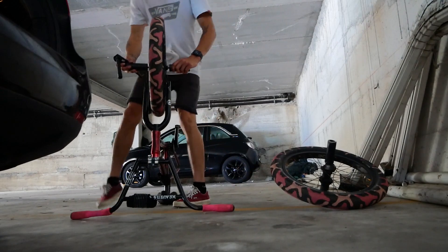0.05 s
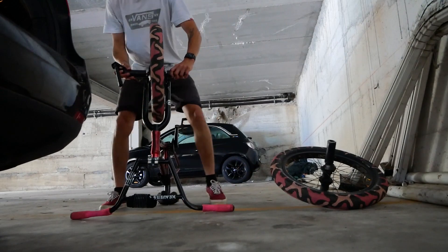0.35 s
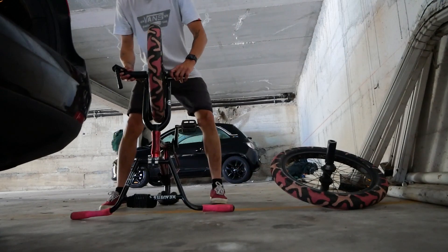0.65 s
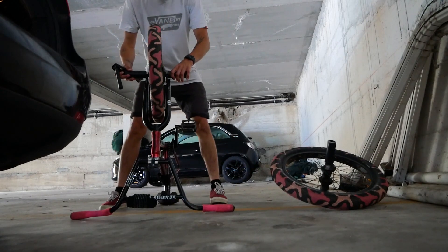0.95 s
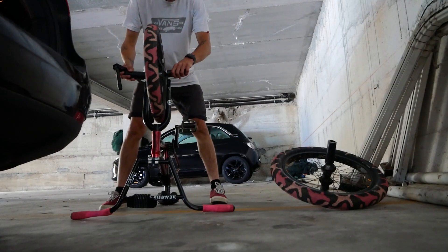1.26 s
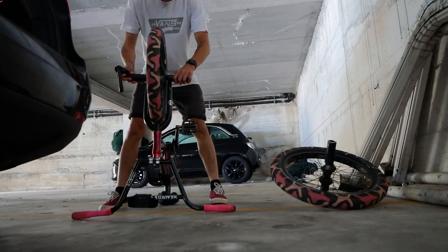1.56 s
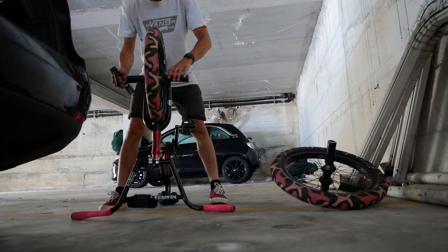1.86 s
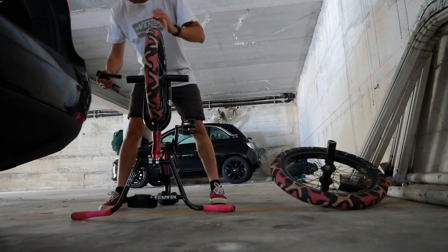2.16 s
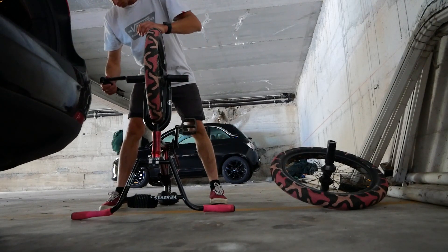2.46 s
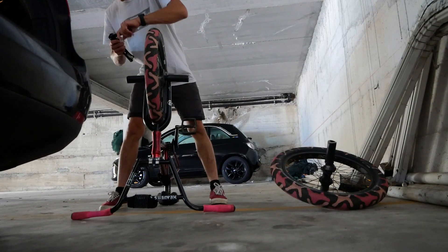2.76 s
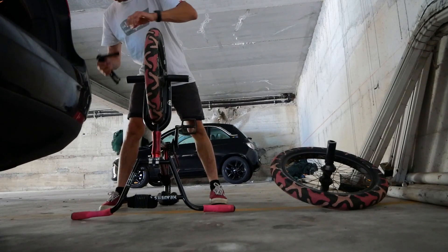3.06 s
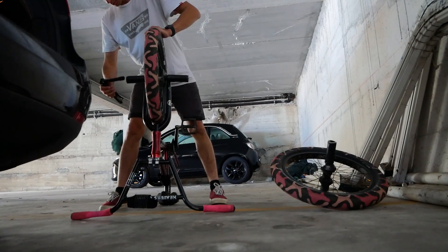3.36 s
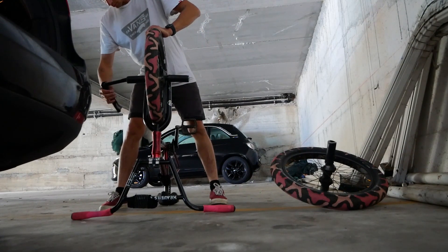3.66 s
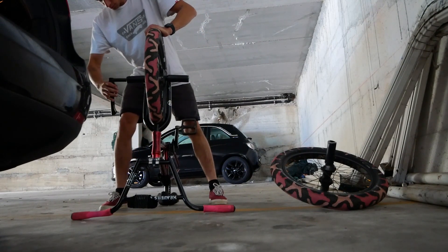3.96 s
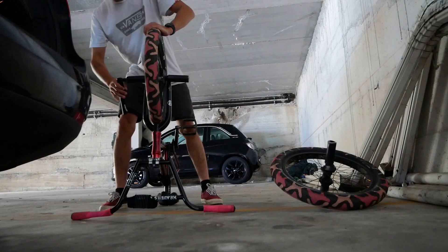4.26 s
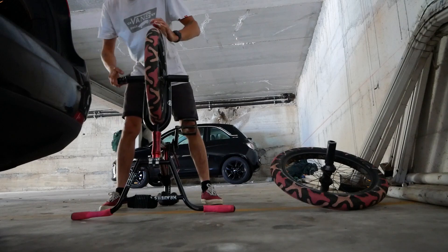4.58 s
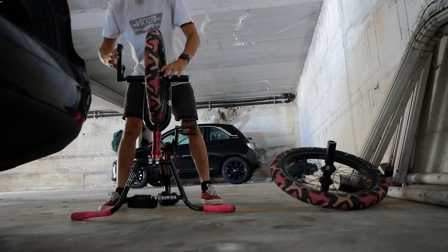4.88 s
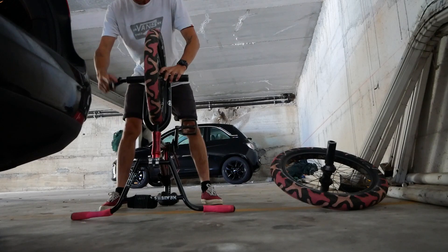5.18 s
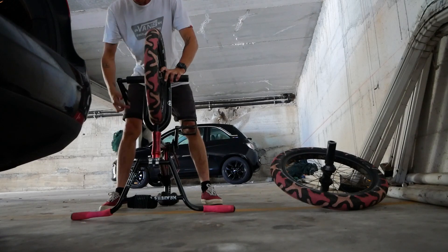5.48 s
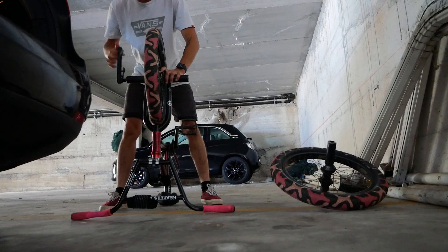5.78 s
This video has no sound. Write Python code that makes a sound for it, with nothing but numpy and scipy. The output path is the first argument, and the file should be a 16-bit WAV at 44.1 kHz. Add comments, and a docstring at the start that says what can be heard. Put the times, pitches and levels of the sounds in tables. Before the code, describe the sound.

In a bare concrete garage with a low hum and distant outdoor noise, someone fits bicycle parts near the microphone. Short gritty scrapes and hard metal knocks come first, with dull thumps and tiny ticks. Clothing brushes during a pause. A second run of bright clanks follows, with a faint high squeak and a far engine swelling, then gentler knocks and scrapes, all with a long echo.

```python
"""A bare concrete garage, the microphone close to an upturned bicycle, a low hum and far outdoor noise behind.
A metal part scrapes, then knocks: hard contacts and hand-damped clanks that leave the frame ringing
faintly and the walls answering with a long tail. Weight thumps on the floor, clothing brushes, tiny ticks snap.
After a lull from 2 s, the knocks return at 3.3 s as parts are fitted; near 4 s a far engine swells
and a part squeaks as it is pushed home. Softer knocks and scrapes end the scene."""
import sys
import numpy as np
from scipy import signal
from scipy.fft import rfft, irfft
from scipy.io import wavfile
from scipy.ndimage import uniform_filter1d

SR = 44100
rng = np.random.default_rng(int(sys.argv[2]) if len(sys.argv) > 2 else 0)


def store_wav(level_fs):
    """Save 16-bit WAV to argv[1]."""
    pcm = np.round(np.clip(np.atleast_2d(level_fs), -1, 1) * 32767)
    wavfile.write(sys.argv[1], SR, pcm.T.astype(np.int16))


N = 257103
TIME = np.arange(N) / SR


def undb(db):
    """Decibels to gain."""
    return 10 ** (np.asarray(db) / 20)


def unit(x):
    """Scale to rms 1."""
    return x / np.sqrt(np.mean(x ** 2))


def along(hz, points, values):
    """Join values by straight lines on a log-frequency axis."""
    return np.interp(np.log(hz + 1), np.log(points), values)


def tint(x, spectrum):
    """Colour a sound with (frequency [Hz], gain [dB]) points, at rms 1."""
    gain_db = along(np.fft.rfftfreq(len(x), 1 / SR), *np.transpose(spectrum))
    return unit(irfft(rfft(x) * undb(gain_db), len(x)))


def causal(gain):
    """Minimum-phase response of a gain curve: nothing sounds before the blow."""
    cepstrum = irfft(np.log(gain))
    cepstrum[len(cepstrum) // 2:] = 0
    cepstrum[1:] *= 2
    return np.exp(rfft(cepstrum))


def fade(t, t60):
    """Exponential decay, 60 dB in t60 seconds."""
    return np.exp(-np.log(1000) * t / t60)


def swell(start, length, attack, release):
    """Envelope that rises up to its start, holds and dies away; attack and release are time constants."""
    return np.exp(np.minimum(TIME - start, 0) / attack - np.maximum(TIME - start - length, 0) / release)


def add(track, s, sound):
    """Mix a sound in at time s."""
    i = int(s * SR)
    track[i:i + len(sound)] += sound[:N - i]


def through(x, response):
    """Pass a sound through an impulse response."""
    return signal.fftconvolve(x, response)[:N]


# distant outdoor noise as it reaches the garage: (frequency [Hz], relative level [dB])
OUTDOOR_SPECTRUM = [(20, -29), (38, -7), (60, -3), (110, -3.5), (200, -4), (250, -6.5), (300, 2), (400, -9),
                    (560, -6.5), (830, -4.5), (1500, -7.5), (4200, -24.5), (10000, -31.5), (15500, -31.5)]


def background(outdoor_db=-56, hum_hz=55, hum_db=-65):
    """Steady noise from far outside, over a low hum."""
    outdoors = undb(outdoor_db) * tint(rng.standard_normal(N), OUTDOOR_SPECTRUM)
    hum = undb(hum_db) * np.sqrt(2) * np.sin(2 * np.pi * hum_hz * TIME)
    return outdoors + hum


# one part sliding on another: (time [s], length [s], level [dB], hiss relative to the level [dB])
SLIDING_STROKES = [(0, 0.038, -27.5, -12.5), (0.069, 0.069, -32.5, -15.5), (0.186, 0.022, -32, 0.5),
                   (.245, .05, -39, -12), (0.338, 0.003, -43.5, 11.5), (1.253, .003, -44.5, -7),
                   (1.353, .005, -48, -19), (1.746, 0.013, -27, -32.5), (3.366, .004, -50, -18),
                   (3.78, 0.26, -49.5, -12.5), (4.059, 0.093, -45.5, -3.5), (4.182, 0.02, -30, -15),
                   (4.354, 0.02, -37.5, -28), (4.93, .05, -56, -15), (5.167, 0.11, -42.5, -21),
                   (5.418, .4, -58, -12)]


def scrape(slips_per_s=1100, scatter_db=2.7, attack_s=0.014, release_s=0.018):
    """Dense uneven slips shake the part during each stroke; faster sliding adds a gritty hiss."""
    slips = (rng.random((2, N)) < slips_per_s / SR) * rng.standard_normal((2, N))
    slips *= undb(scatter_db * rng.standard_normal((2, N)))
    grit = unit(slips) + 1.35 * rng.standard_normal((2, N))
    body = tint(grit[0], [(100, -41), (300, -17), (600, -10.5), (1000, -9), (1500, 4), (2250, 3.5),
                          (2900, -6), (4200, -11.5), (7000, -43), (15000, -46)])
    hiss = tint(grit[1], [(300, -35), (1500, -17), (2600, 6), (4000, 5.5), (6000, -1), (8000, -7),
                          (11000, -13.5), (15000, -26)])
    return sum(undb(db) * swell(s, length, attack_s, release_s) * (body + undb(hiss_db) * hiss)
               for s, length, db, hiss_db in SLIDING_STROKES)


# long rings of the frame and its fittings, with a resonance of the garage itself near 311 and 325 Hz:
# (frequency [Hz], relative level [dB], t60 [s])
FRAME_MODES = [(232, -9.5, 2.8), (311.3, -4, 0.49), (325.5, 1.5, 0.16), (847.5, 3, 0.19), (1119, 2.5, 0.43),
               (1174, -0.5, 1), (1354, 1.5, 0.37), (1606, -17, 1.6), (2140, -35, .8), (2250, -13.5, 0.51),
               (2530, -24, 0.52), (2680, -14, 0.42), (2730, -19, 0.2), (3002, -26, 0.37), (3620, -14, 0.71),
               (3940, -12.5, 1.03), (4370, -24, 0.17), (4570, -34, .65), (5600, -30, 0.21),
               (5610, -9, 0.31), (6588, -14, 1.9)]


def frame_ring(contacts, ring_db=-58):
    """Lightly damped modes of tubes and fittings ring on after each scrape and blow, and the garage answers
    briefly near 320 Hz."""
    t = TIME[:SR]
    modes = sum(undb(db) * fade(t, t60) * np.cos(2 * np.pi * hz * t) for hz, db, t60 in FRAME_MODES)
    return undb(ring_db) * through(contacts, modes)


# tail of the bare concrete room: (frequency [Hz], t60 [s], relative level [dB])
GARAGE_TAIL = [(95.4, 1.1, -5.5), (239, 1.38, 3.5), (316, 0.93, 7), (394, 1.42, 5), (735, 1.54, 2),
               (1550, 1.594, -1.5), (2730, 1.46, -5), (5400, 1.41, -8), (9000, 0.89, -6),
               (15300, 0.41, -19)]


def garage(early_db=-7, early_t60=0.39, tail_db=-4, build_s=0.0016, bands=27):
    """Near walls and floor answer first, then a diffuse tail that loses its treble."""
    t = TIME[:2 * SR]
    f = np.fft.rfftfreq(len(t), 1 / SR)
    hz, t60, db = np.transpose(GARAGE_TAIL)
    spectrum = rfft(rng.standard_normal(len(t)))
    centres = np.geomspace(hz[0], hz[-1], bands)
    tail = 0
    for centre, weights in zip(centres, np.eye(bands)):
        band = irfft(spectrum * along(f, centres, weights))
        tail += band * fade(t, along(centre, hz, t60)) * undb(along(centre, hz, db))
    onset = 1 - np.exp(-(t / build_s) ** 2)
    reflections = rng.standard_normal(len(t)) * (rng.random(len(t)) < .05)
    early = unit(reflections * fade(t, early_t60) * onset) / np.sqrt(len(t))
    return undb(early_db) * early + undb(tail_db) * tail * onset / np.sqrt(.1 * SR)


def shifting_echo(x, shift_hz=1.7):
    """The parts move between blows, so the pattern of echoes at the microphone keeps shifting."""
    angle = 2 * np.pi * shift_hz * TIME
    return through(x * np.cos(angle), garage()) + through(x * np.sin(angle), garage())


# short rings of the hand-held steel part: (frequency [Hz], width [Hz], nominal lift [dB])
STEEL_MODES = [(3705, 210, 4.5), (4140, 260, 1.5), (4700, 40, 8.5), (6670, 96, 8.5), (7140, 130, 10),
               (7790, 220, 7.5), (8550, 63, 9.5), (9590, 790, 7), (10720, 56, 11.5), (11260, 100, 12),
               (13050, 450, 24.5), (13700, 120, 11), (14000, 140, 18), (14800, 180, 26)]


def steel_gain(f, grip_db=7.5):
    """The grip and the point of contact favour different resonances of the part at each blow."""
    favour = undb(grip_db * rng.standard_normal(len(STEEL_MODES)))
    peaks = sum(share * (undb(db) - 1) / (1 + (2 * (f - hz) / width) ** 2)
                for share, (hz, width, db) in zip(favour, STEEL_MODES))
    return (1 + peaks) * undb(along(f, [2500, 6000, 10000], [0, -2.5, -6]))


# mean colour of a clank: (frequency [Hz], relative level [dB])
CLANK_SPECTRUM = [(100, -22.5), (200, -16), (310, -6), (480, -8.5), (800, -1.5), (1100, -5.5), (1500, 2),
                  (2100, 1), (2900, -4), (4200, -10.5), (5700, -11.5), (7000, -27), (11000, -29),
                  (15500, -65)]


def clank(weight_db, hardness_db, ping_hz, contact_share, t60, crack_t60=0.037, size=8192):
    """A hard contact, then a crowd of short modes with one leading ping."""
    t, f = TIME[:size], np.fft.rfftfreq(size, 1 / SR)
    body, crack = rng.standard_normal((2, size))
    body = tint(body, [(100, -4.5), (2200, 6), (5000, -13), (15000, -3)]) * fade(t, t60)
    crack = tint(crack, [(300, 5.5), (1500, -20), (3500, 6), (15000, -14)]) * fade(t, crack_t60)
    modes = rfft(unit(body + 0.56 * crack)) / np.sqrt(size)
    push = 1 / (1 + 1j * f / 6000)  # the contact lasts a moment, which rounds its treble
    spectrum = np.sqrt(1 - contact_share) * modes + np.sqrt(contact_share) * push
    outline = np.sqrt(uniform_filter1d(abs(spectrum) ** 2, 75))  # divided out to leave the fine peaks
    # weight lifts the thud and, less, the knock; hardness lifts the brightness and the fizz above it
    knock_db, fizz_db = 0.65 * weight_db, 1.44 * hardness_db - 1.5
    colour_db = along(f, *np.transpose(CLANK_SPECTRUM))
    colour_db += along(f, [350, 850, 1500, 2300, 4000, 9000],
                       [weight_db, knock_db, 0, 0, hardness_db, fizz_db])
    # small stiff parts ping more purely than large ones; a firm contact damps the ping and so widens it
    ping_db = 6.5 + 3.2 * np.log2(ping_hz / 2000)
    width_hz = 100 * (1 + 3 * contact_share)
    ping = 1 + (undb(ping_db) - 1) / (1 + ((f - ping_hz) / width_hz) ** 2)
    sound = irfft(spectrum * causal(undb(colour_db) * ping * steel_gain(f) / outline))
    return sound / np.sqrt(np.sum(sound ** 2) / (0.012 * SR))  # the energy of 12 ms at rms 1


def blow(db, weight_db, hardness_db, ping_hz, contact_share, firm_db=-17, firm_t60=0.053):
    """One contact: a firm blow comes from a tight grip, which damps the clank sooner."""
    t60 = firm_t60 * 2 ** ((firm_db - db) / 47)  # twice as long when 47 dB softer
    return undb(db) * clank(weight_db, hardness_db, ping_hz, contact_share, t60)


# metal on metal at the bicycle: (time [s], level [dB], weight [dB], hardness [dB], ping [Hz],
# bare contact share [0-1], rebound [share of the blow])
METAL_BLOWS = [(0.131, -28.5, 9, -2, 1930, 0, 0), (0.2463, -19, 1, -26, 2030, 0.03, 0.12),
               (0.334, -19.5, 2.5, -1.5, 1960, .05, 0.58), (0.6481, -23, -3.5, -1, 2070, 0.21, 0.2),
               (1.2422, -33, 3, -1, 1850, 0, 0), (1.257, -28.5, 4.5, 0, 2010, .25, 0.059),
               (1.4061, -23, -2, 2.5, 2950, 0.42, 0.39), (1.438, -20.5, 1.5, 7.5, 1670, 0.08, 0.58),
               (1.527, -19, -3, -3, 2160, 0.44, 0.18), (1.615, -16.5, -5.5, 1.5, 1880, 0, .3),
               (1.6285, -15, 1, 5, 1980, 0, 0), (1.7574, -27.5, 7, 8.5, 1940, 0.4, 0.11),
               (2.838, -48.5, 2, 6.5, 4950, 0.27, 0), (3.343, -44, 6.5, 0.5, 1960, .1, 0.56),
               (3.376, -36, 3.5, -1.5, 2020, 0, 0.53), (3.388, -45, 11, 14, 12800, 0.5, 0.098),
               (3.4716, -35, 4, -1, 2000, 0.06, 0.015), (3.573, -22, -1, 5.5, 1770, 0.28, .1),
               (3.9278, -33, -2, 8, 4000, .1, 0.11), (3.9375, -29.5, 2, 11.5, 3870, 0.6, 0.028),
               (4.109, -33, 8, 4.5, 2630, 0.37, 0), (4.1376, -22.5, 3, 12.5, 3920, 0.37, 0.34),
               (4.151, -20.5, -3.5, 12, 1700, 0.03, 0.93), (4.213, -20, -8, 6, 5700, .4, 0.76),
               (4.3009, -17.5, -2, 4.5, 5760, .15, 0.3), (4.347, -26.5, -7, 2.5, 2100, .1, 0),
               (4.78, -32, -4.5, 0.5, 3420, 0.69, 0.014), (5.004, -41, 5.5, -13, 1410, 0.34, 0),
               (5.064, -45, 6, -10, 1250, 0.06, 0.083), (5.1648, -34.5, 9, 0.5, 1720, 0.13, 0.14),
               (5.1987, -24, -4, 4.5, 2530, 0.1, 0.64), (5.3172, -31.5, -3, 0, 1950, 0, 0.071),
               (5.6273, -36, -6, -2.5, 1400, 0, 0), (5.787, -39.5, 3, -3, 1930, 0, 0.056)]


def knocks(rebound_s=0.0075, rebound_hardness_db=-12, rebound_hz=2050):
    """Parts strike each other; a loose one drops back once, softer and duller."""
    out = np.zeros(N)
    for s, db, weight_db, hardness_db, ping_hz, contact_share, rebound in METAL_BLOWS:
        add(out, s, blow(db, weight_db, hardness_db, ping_hz, contact_share))
        drop = blow(db, weight_db, hardness_db + rebound_hardness_db, rebound_hz, contact_share=0)
        add(out, s + rebound_s, rebound * drop)
    return out


# weight landing on the concrete floor: (time [s], level [dB])
FLOOR_THUMPS = [(0.132, -58), (0.337, -42.5), (1.615, -33.5), (1.63, -46)]


def thumps(t60=0.21, rise_s=0.03, size=8192):
    """Soft, heavy pushes shake only the low modes."""
    out, t = np.zeros(N), TIME[:size]
    envelope = fade(t, t60) * (1 - fade(t, rise_s))
    colour = [(35, -36), (70, -14), (110, -18), (160, -5), (230, -5.5), (400, -9.5), (2000, -68)]
    for s, db in FLOOR_THUMPS:
        add(out, s, undb(db) * envelope * tint(rng.standard_normal(size), colour))
    return out


# clothing against the bicycle: (time [s], half-width [s], level [dB])
CLOTH_BRUSHES = [(0.56, 0.01, -58.5), (1.087, .015, -62), (2.78, .022, -65), (2.84, 0.0099, -55.5),
                 (2.996, 0.032, -64.5), (5, 0.02, -63.5)]


def cloth():
    """Fabric brushes past in short swells of high, soft hiss."""
    envelope = sum(undb(db) * np.exp(-((TIME - s) / width) ** 2) for s, width, db in CLOTH_BRUSHES)
    colour = [(500, -17), (2500, 7), (5000, 5.5), (9000, 0.5), (14000, 4.5), (16000, -6)]
    return envelope * tint(rng.standard_normal(N), colour)


# tiny dry ticks close to the microphone: (time [s], level [dB])
CLOSE_TICKS = [(.805, -56), (.853, -54), (.8784, -55), (0.9, -53), (1.1502, -48.5), (1.953, -53)]


def ticks(hz=6300, t60=0.0024, size=256):
    """Single tiny snaps, too close and weak to wake the room."""
    out, t = np.zeros(N), TIME[:size]
    snap = unit(np.sin(2 * np.pi * hz * t) * fade(t, t60))
    for s, db in CLOSE_TICKS:
        add(out, s, undb(db) * snap)
    return out


def far_engine(start_s=3.8, length_s=1, fade_s=0.25, db=-66.5, start_hz=83, rise_hz_per_s=8):
    """An engine far from the garage speeds up steadily, swells and fades."""
    hz = start_hz + rise_hz_per_s * (TIME - start_s)
    drone = np.sqrt(2) * np.sin(2 * np.pi * np.cumsum(hz) / SR)
    return undb(db) * drone * swell(start_s, length_s, fade_s, fade_s)


def squeak(line_hz=14000, line_db=-64.5, rub_hz=10900, rub_db=-61.5):
    """A part is pushed home: friction sings in one thin line above a narrow band of hiss."""
    f = np.fft.rfftfreq(N, 1 / SR)
    friction = 0
    for hz, width_hz, db in [(line_hz, 70, line_db), (rub_hz, 600, rub_db)]:
        band = rfft(rng.standard_normal(N)) / (1 + ((f - hz) / width_hz) ** 2)
        friction += undb(db) * unit(irfft(band, N))
    return friction * swell(start=3.93, length=0.16, attack=0.046, release=0.035)


def scene(width_db=-26, side_noise_db=-73):
    """The bicycle stands straight ahead of the microphone; room treble and faint noise spread a little."""
    contacts = knocks() + scrape()
    bike = contacts + frame_ring(contacts) + thumps() + squeak() + cloth()
    mid = bike + shifting_echo(bike) + ticks() + background() + far_engine()
    room = through(bike, garage())
    room_colour = [(100, 5.1), (500, 10.4), (1500, 0.92), (4000, 13.5), (8000, 25), (15000, 16)]
    noise_colour = [(40, 23), (200, 16), (1000, 1), (5000, 11.5), (15000, 8.5)]
    side = undb(width_db) * np.std(room) * tint(room, room_colour)
    side += undb(side_noise_db) * tint(rng.standard_normal(N), noise_colour)
    return np.array([mid + side, mid - side])


def record(dry, top_hz=15700):
    """The recorder cuts the top with a steep low-pass."""
    return signal.sosfilt(signal.ellip(8, .2, 70, top_hz, fs=SR, output="sos"), dry)


dry = scene()
out = record(dry)
store_wav(out)
```